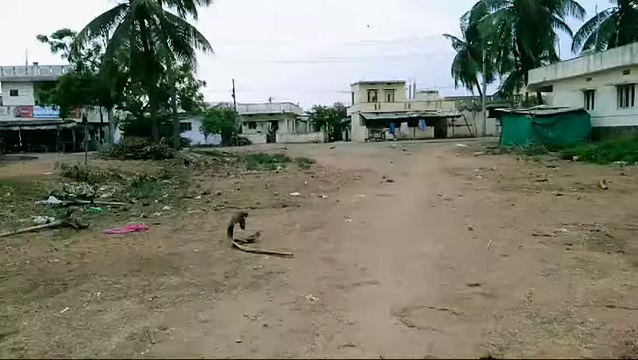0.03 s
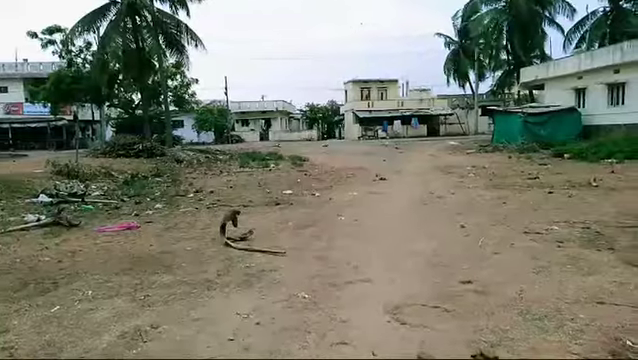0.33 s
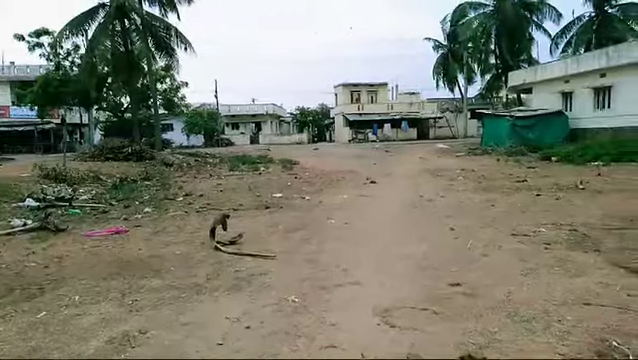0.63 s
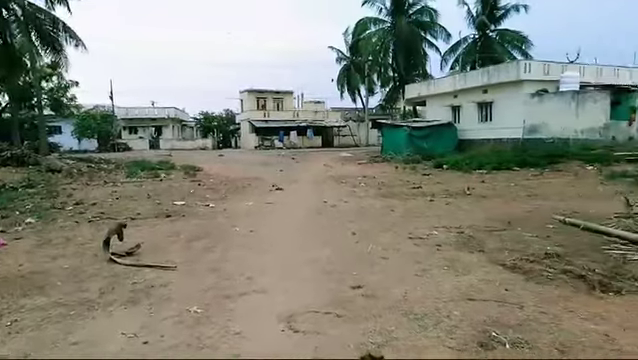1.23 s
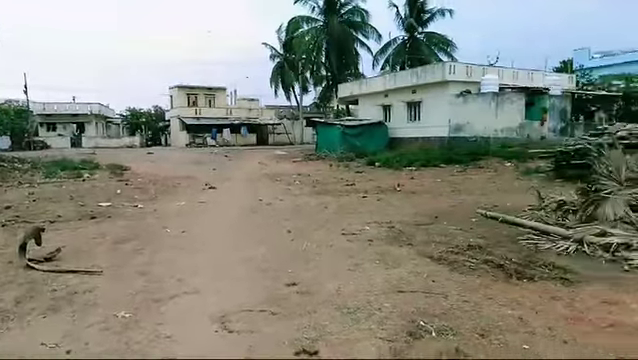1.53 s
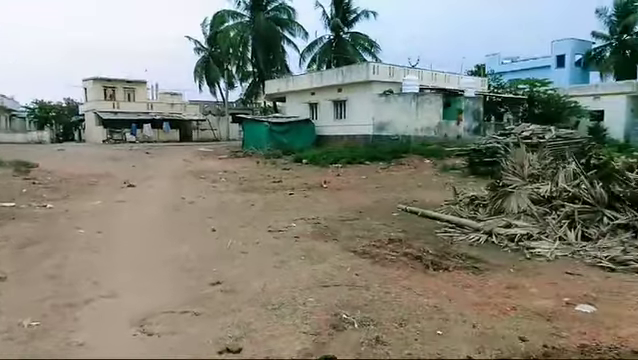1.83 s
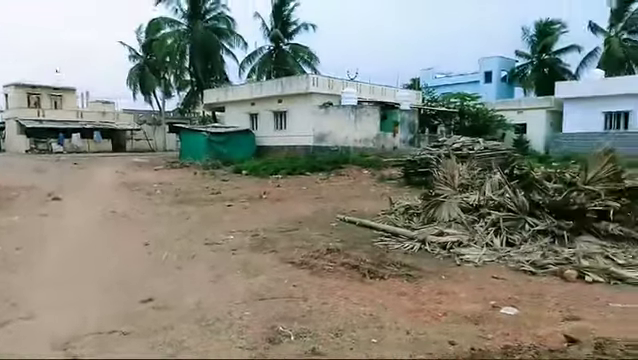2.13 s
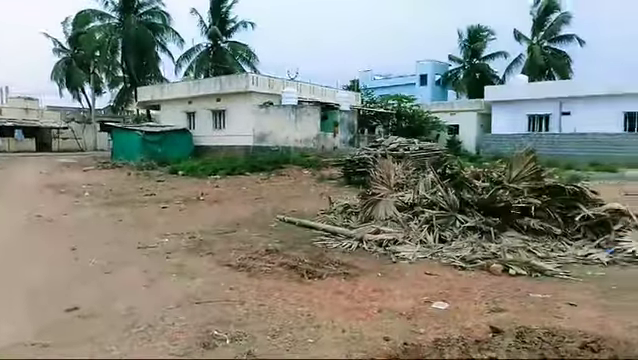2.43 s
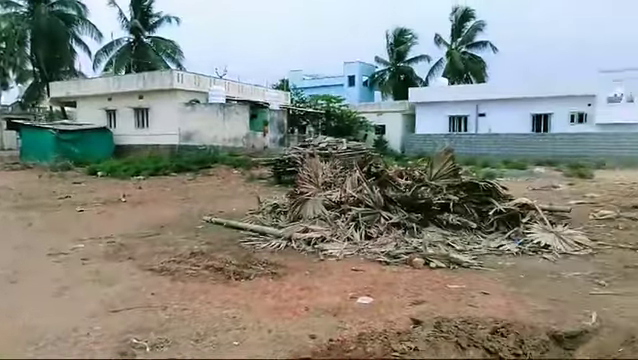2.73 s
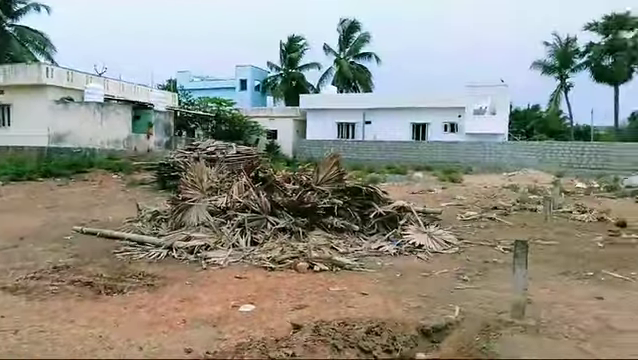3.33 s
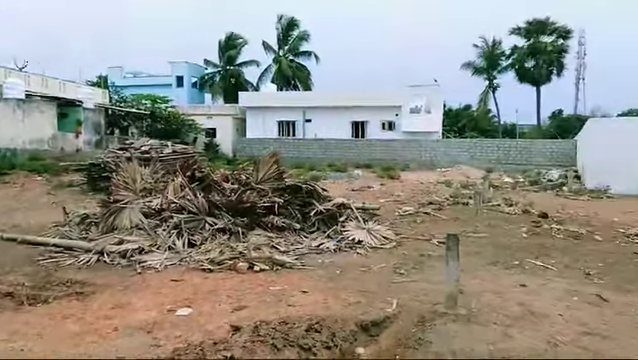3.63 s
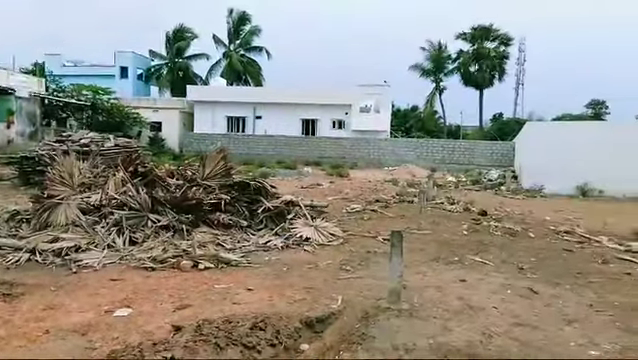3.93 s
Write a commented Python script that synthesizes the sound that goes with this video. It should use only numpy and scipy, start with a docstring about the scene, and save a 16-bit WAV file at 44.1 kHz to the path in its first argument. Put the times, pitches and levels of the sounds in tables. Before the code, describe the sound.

Wind buffets a hand-held microphone on an open village plot. Light puffs come first, while a distant vehicle faintly whines up and down over a soft hiss. A short rumbling gust follows, then a longer, stronger, fluttering one.

```python
"""Wind buffets a hand-held microphone on an open village plot: light puffs, a short gust, a long strong one.
Turbulent pressure fluctuations make each gust a low rumble, with a flutter of eddies that sharpens
as it blows harder. Far off, a vehicle whines up and down over a faint outdoor hiss.
The sound opens abruptly with a soft bump."""
import sys
import numpy as np
from scipy import signal
from scipy.fft import rfft, irfft
from scipy.io import wavfile
from scipy.ndimage import uniform_filter1d

SR = 44100
rng = np.random.default_rng(int(sys.argv[2]) if len(sys.argv) > 2 else 0)


def unload_audio(sound):
    """Save the sound as a 16-bit wav file, at the path given as the first command line argument."""
    columns = np.transpose(np.atleast_2d(sound))
    # keep every value between -1 and 1, then stretch to whole-number steps
    steps = np.round(np.clip(columns, -1, 1) * 32767)
    wavfile.write(sys.argv[1], SR, steps.astype(np.int16))


N = 176400

# Noise spectra: f/Hz, relative level/dB
OUTDOOR_SPECTRUM = [(20, -3), (70, 1), (170, 0), (290, -10.5), (450, -11), (800, -8.5), (1200, -10.5),
                    (1600, -11), (2000, -12.5), (2500, -14), (3200, -22.5), (4500, -33), (9000, -55.5)]
HISS_SPECTRUM = [(1000, -8.5), (5000, -5), (6000, -3.5), (6950, 1.5), (8000, -5), (9500, -11),
                 (15500, -9.5)]
PUFF_SPECTRUM = [(6, 19), (28, 6.5), (60, 2), (160, -7), (300, -20), (1000, -52)]
SWAY_SPECTRUM = [(12, -15.5), (40, 4.5), (70, 5.5), (135, 1), (210, -3.5), (350, -21.5), (600, -40),
                 (1200, -89.5)]
BUFFET_SPECTRUM = [(15, -33), (45, -33), (75, -9), (140, 0.5), (220, -9), (350, -23.5), (600, -42),
                   (1200, -89.5)]
FLUTTER_SPECTRUM = [(100, -21), (260, -2.5), (560, 5), (800, -13.5), (1100, -32.5), (3000, -89)]
CRACKLE_SPECTRUM = [(400, -12.5), (800, 7.5), (1300, -4), (1900, -12), (3000, -49.5)]
# Murmur of the distant village and traffic: t/s, level/dB
OUTDOOR_LEVEL = [(.23, -60.5), (.8, -62), (1.5, -57.5), (1.95, -59.5), (2.4, -58.5), (3.6, -61),
                 (3.9, -58.5)]
# Modes of the opening bump: f/Hz, initial level/dB, decay time/s
BUMP_MODES = [(135, -32.5, 0.0069), (305, -36.5, 0.0018)]
# Fundamental of the vehicle's whine: t/s, f/Hz, level/dB
WHINE = [(.25, 436, -88), (.45, 449.6, -72), (.65, 486, -71.5), (.85, 522.6, -79), (.97, 511.3, -71),
         (1.17, 452.4, -69.5), (1.3, 427, -77), (1.45, 410, -100)]
# Its upper partials: harmonic number, level/dB
WHINE_PARTIALS = [(4, -76.5), (5, -70.5), (6, -79.5)]
# Narrow hums of far traffic: t/s, half length/s, f/Hz, bandwidth/Hz, level/dB
TRAFFIC_HUMS = [(.9, .6, 790, 90, -70.5), (1.5, .5, 1570, 170, -67), (1.87, .15, 2420, 90, -71)]
# Light puffs of air: t/s, half length/s, relative level/dB
PUFFS = [(0.538, 0.025, -49.5), (0.662, 0.11, -51.5), (0.968, 0.1, -58.5), (1.187, 0.042, -47),
         (1.325, 0.034, -55.5), (1.484, 0.018, -48.5), (1.569, 0.021, -46.5), (2.513, 0.11, -62.5),
         (2.749, 0.024, -49)]
# Envelopes of the gusts: t/s, relative level/dB
SHORT_GUST = [(1.615, -54), (1.654, -31.5), (1.812, -39.5), (1.836, -59), (1.945, -35), (1.992, -29.5),
              (2.12, -37.5), (2.268, -48.5)]
LONG_GUST = [(2.8, -61), (2.892, -35.5), (2.936, -35), (2.962, -25), (3.125, -30.5), (3.204, -21),
             (3.32, -27), (3.505, -22.5), (3.588, -28), (3.672, -21), (3.742, -34), (3.806, -37.5),
             (3.832, -33.5), (3.902, -38.5), (3.978, -19), (4.0, -24.5)]
# Brief lulls in the long gust: t/s, level change/dB
LULLS = [(2.856, -5), (2.935, -3), (3.024, -7), (3.117, -5.5), (3.258, -5.5), (3.324, -1), (3.862, -12.5),
         (3.914, -20), (3.954, -8)]
# Flaps of turbulence in the gusts: t/s, half length/s, relative level/dB
FLAPS = [(1.673, 0.015, -48.5), (1.786, 0.013, -47.5), (2.022, 0.023, -42.5), (3.038, 0.003, -38),
         (3.148, 0.0026, -37.5), (3.198, 0.017, -30), (3.385, 0.018, -41.5), (3.486, 0.013, -42),
         (3.59, 0.029, -46.5), (3.674, 0.0086, -38)]
# Sharpest single eddies: t/s, relative level/dB, centre f/Hz
EDDIES = [(1.699, -31, 356), (1.718, -27.5, 388), (1.934, -36, 500), (2.0238, -16.5, 528),
          (2.0913, -24.5, 320), (2.968, -19.5, 292), (2.9865, -26.5, 493), (3.013, -31, 462),
          (3.0477, -22, 384), (3.070, -28.5, 340), (3.102, -29, 396), (3.1562, -25, 428), (3.174, -28, 650),
          (3.1831, -17, 575), (3.1966, -15, 566), (3.210, -28.5, 780), (3.2988, -24.5, 406),
          (3.3107, -25.5, 277), (3.349, -23.5, 332), (3.386, -27, 537), (3.4057, -18.5, 455),
          (3.419, -26, 540), (3.4237, -19, 465), (3.4482, -13.5, 403), (3.4846, -20, 508),
          (3.541, -21, 300), (3.640, -26.5, 468), (3.656, -15, 590), (3.6705, -20.5, 400),
          (3.6911, -21, 460), (3.7029, -22, 338), (3.7655, -26.5, 328), (3.840, -34, 253),
          (3.883, -37.5, 277), (3.937, -27, 372), (3.981, -19, 450)]
# Air rushing past the case: t/s, half length/s, level/dB, centre f/Hz
RUSHES = [(1.98, 0.047, -54.5, 1100), (2.09, 0.02, -74, 7000), (3.225, 0.013, -67.5, 7330),
          (3.33, 0.073, -77.5, 6000)]


def undb(db):
    """Amplitude ratio of a level in dB."""
    return 10 ** (np.asarray(db) / 20)


def unit(x):
    """Normalisation to rms 1."""
    return x / np.sqrt(np.mean(x ** 2) + 1e-30)


def curve(table, column=1):
    """Linear interpolation of one column in time."""
    rows = np.array(table, float)
    return np.interp(np.arange(N) / SR, rows[:, 0], rows[:, column])


def colour(x, spectrum):
    """Spectral shaping, interpolated in log frequency; the result has rms 1."""
    hz, db = np.array(spectrum, float).T
    f = np.maximum(np.arange(N // 2 + 1) * SR / N, 1)
    gain = undb(np.interp(np.log(f), np.log(hz), db))
    return unit(irfft(rfft(x) * gain, N))


def band(hz, width_hz):
    """Resonance: white noise confined to one peak."""
    f = np.arange(N // 2 + 1) * SR / N
    noise_spectrum = rfft(rng.standard_normal(N))
    return unit(irfft(noise_spectrum / (1 + ((f - hz) / width_hz * 2) ** 2), N))


def swell(at, half_s):
    """Gaussian envelope; its half length is one standard deviation."""
    return np.exp(-.5 * ((np.arange(N) / SR - at) / half_s) ** 2)


def smooth(x, samples):
    """Low-pass filtering by two moving averages."""
    return uniform_filter1d(uniform_filter1d(x, samples), samples)


def even(x, span_s):
    """Division by the running rms evens out slow swings and keeps the fine grain."""
    power = smooth(x ** 2, max(int(span_s * SR), 8))
    return x / np.sqrt(np.abs(power) + 1e-4)


def drift(rate_hz):
    """Slow random modulation of rms 1."""
    hold = int(SR / rate_hz)
    steps = np.repeat(rng.standard_normal(N // hold + 1), hold)
    return unit(smooth(steps, hold)[:N])


def background():
    """Broadband noise: the wavering murmur of the distant village and a steady fine hiss."""
    murmur = colour(rng.standard_normal(N), OUTDOOR_SPECTRUM) * undb(curve(OUTDOOR_LEVEL) + .5 * drift(18))
    hiss = undb(-70) * colour(rng.standard_normal(N), HISS_SPECTRUM)
    return murmur + hiss


def bump(at_s=.236):
    """Damped oscillation: a low knock dies within a few cycles."""
    t = np.maximum(np.arange(N) / SR - at_s, 0)
    return sum(undb(db) * np.exp(-t / decay) * np.sin(2 * np.pi * hz * t) for hz, db, decay in BUMP_MODES)


def vehicle(waver=.006, fading_db=1.2, scatter_hz=222.4):
    """Random modulation: moving air blurs the upper partials of a far whine that rises and falls."""
    pitch_hz = curve(WHINE) * (1 + waver * drift(110))
    phase = 2 * np.pi * np.cumsum(pitch_hz) / SR
    level_db = curve(WHINE, column=2) + fading_db * drift(19)
    fundamental = np.sqrt(2) * np.sin(phase) * undb(level_db)
    upper = sum(undb(db) * (drift(scatter_hz) * np.sin(k * phase) + drift(scatter_hz) * np.cos(k * phase))
                for k, db in WHINE_PARTIALS)
    return fundamental + upper * swell(at=.81, half_s=.36)  # brightest at the top of the rise


def traffic():
    """Narrow-band noise: hums of far traffic swell and fade."""
    return sum(undb(db) * swell(at, half) * band(hz, width) for at, half, hz, width, db in TRAFFIC_HUMS)


def puffs(gain_db=4.5):
    """Low-frequency pressure fluctuation: light air brushes the microphone with a push and a rumble."""
    pressure = even(colour(rng.standard_normal(N), PUFF_SPECTRUM), span_s=.05)
    return pressure * sum(undb(db + gain_db) * swell(at, half) for at, half, db in PUFFS)


def gust_level(edge_db_per_s=241):
    """Envelope of the gusts in dB: exponential rise and decay at the ends, dips in the lulls."""
    t = np.arange(N) / SR
    levels = []
    for gust in (SHORT_GUST, LONG_GUST):
        outside_s = np.abs(t - np.clip(t, gust[0][0], gust[-1][0]))
        levels.append(curve(gust) - edge_db_per_s * outside_s)
    return np.max(levels, axis=0) + sum(db * swell(at, half_s=.007) for at, db in LULLS)


def gusts(kicks_per_s=380, spread_db=4, buffet_db=-26, transition_db=2.5, gain_db=1.5):
    """Turbulence as shot noise: random pressure kicks make rumble, flutter and a dull crackle."""
    kicks = (rng.random(N) < kicks_per_s / SR) * rng.choice([-1, 1], N)
    kicks = kicks * undb(spread_db * rng.standard_normal(N))
    level_db = gust_level()
    buffet_share = .5 + .5 * np.tanh((level_db - buffet_db) / transition_db)
    sway = (1 - buffet_share) * colour(kicks, SWAY_SPECTRUM)
    buffet = buffet_share * colour(kicks, BUFFET_SPECTRUM)
    rumble = even(sway + buffet, span_s=.016) * undb(level_db)
    between_flaps = undb(-50.5 + 1.78 * (level_db - buffet_db))  # grows 1.78 dB per dB of gust
    flaps = sum(undb(db) * swell(at, half) for at, half, db in FLAPS)
    turbulence = np.hypot(between_flaps, flaps)
    flutter = even(colour(kicks, FLUTTER_SPECTRUM), span_s=.033) * turbulence
    crackle_gain = undb(-36.5) * (turbulence / undb(-33.5)) ** 2.07  # heard in the hardest flaps
    crackle = even(colour(kicks, CRACKLE_SPECTRUM), span_s=.055) * crackle_gain
    return (rumble + flutter) * undb(gain_db) + crackle


def eddies(gain_db=-.5, core_ratio=1.78, core_db=-20.5):
    """Convection: each eddy crossing the microphone port gives a pressure peak between two troughs."""
    def pulse(u):
        return (1 - 2 * u ** 2) * np.exp(-u ** 2)

    t, pressure = np.arange(N) / SR, np.zeros(N)
    for at, db, hz in EDDIES:
        u = np.pi * hz * (t - at)
        core = undb(core_db) * pulse(u * core_ratio)  # a tighter, weaker core sharpens the peak
        pressure += undb(db + gain_db) * (pulse(u) + core)
    return pressure


def rushes(width_hz=1800):
    """Flow noise: air rushing past the case hisses briefly during the gusts."""
    return sum(undb(db) * swell(at, half) * band(hz, width_hz) for at, half, db, hz in RUSHES)


def scene():
    """Superposition of the distant village and the wind at the microphone, in one channel."""
    return (background() + bump() + vehicle() + traffic() + puffs() + gusts() + eddies() + rushes())[None]


def record(dry, opens_s=.229, ceiling=.42, cutoff_hz=15720):
    """Saturation and band limiting: the microphone opens abruptly, rounds peaks and cuts the top."""
    live = np.arange(N) / SR >= opens_s
    rounded = ceiling * np.tanh(dry / ceiling)
    low_pass = signal.ellip(12, .1, 90, cutoff_hz, fs=SR, output="sos")
    return signal.sosfilt(low_pass, rounded * live)


dry = scene()
out = record(dry)
unload_audio(out)
```